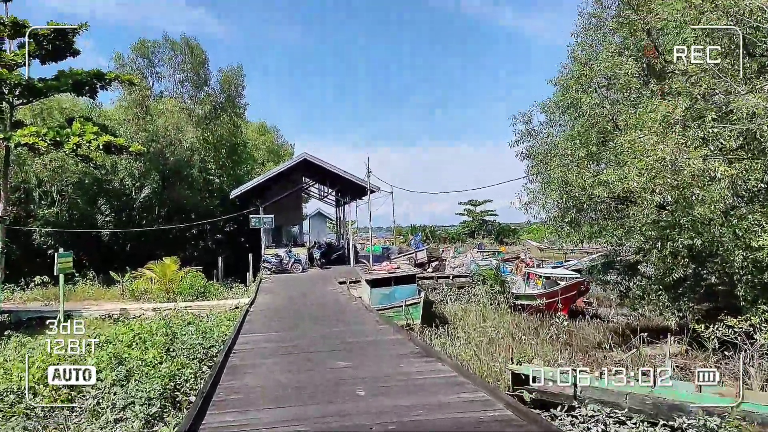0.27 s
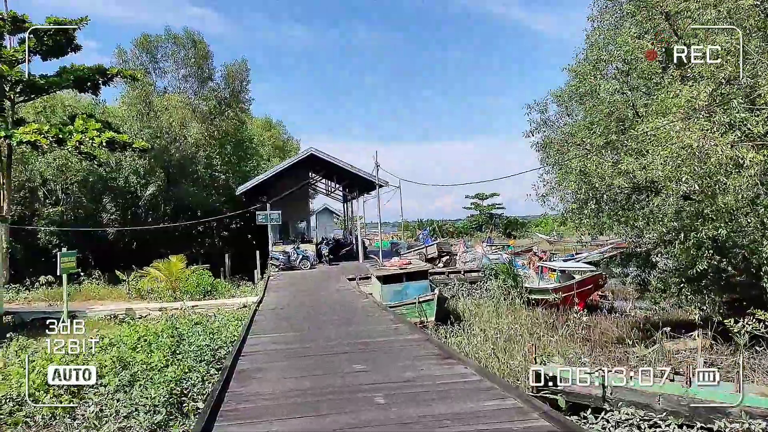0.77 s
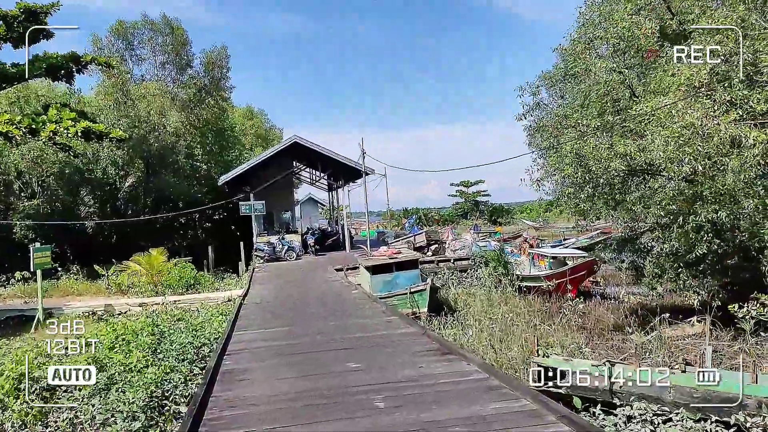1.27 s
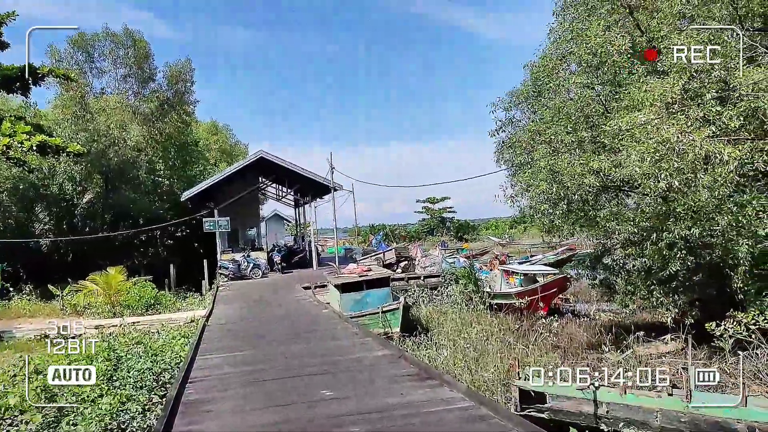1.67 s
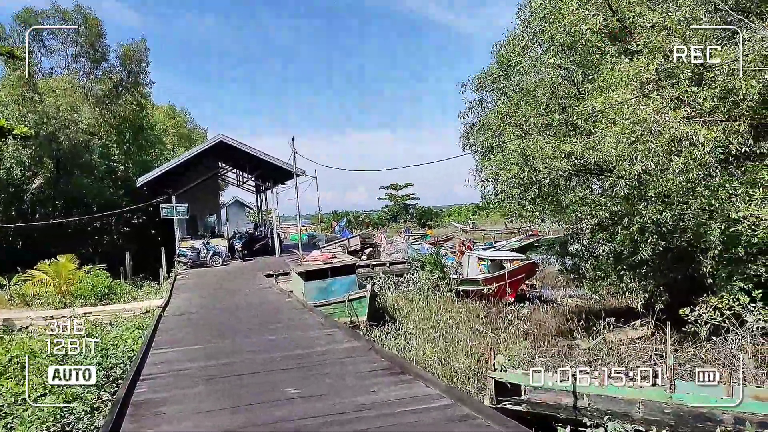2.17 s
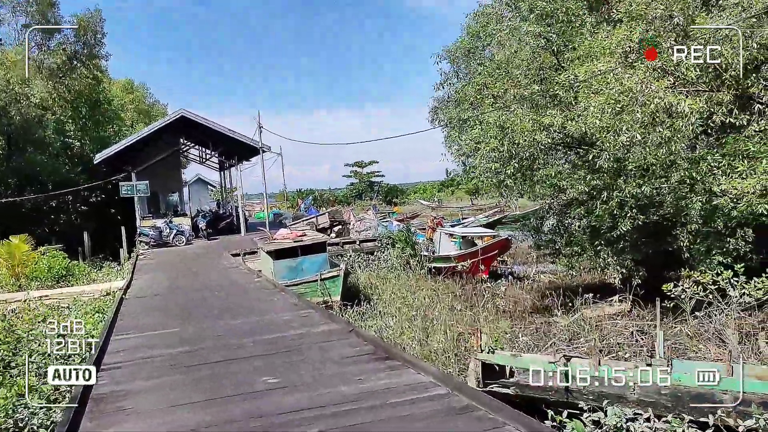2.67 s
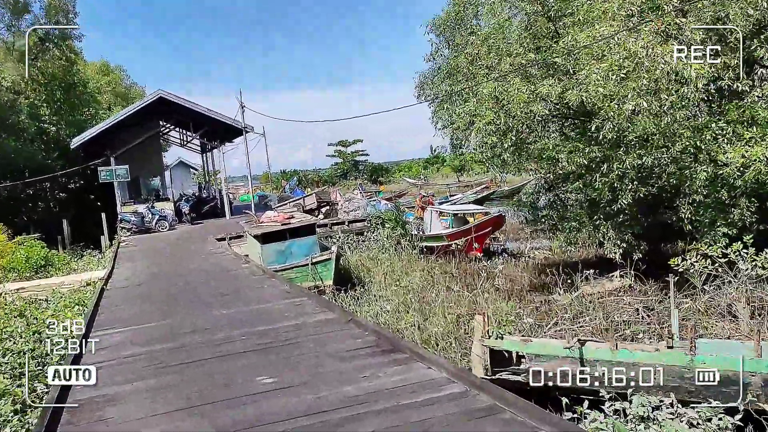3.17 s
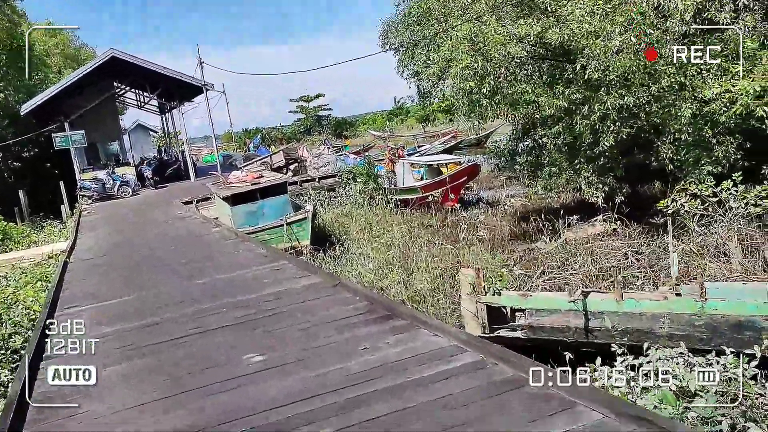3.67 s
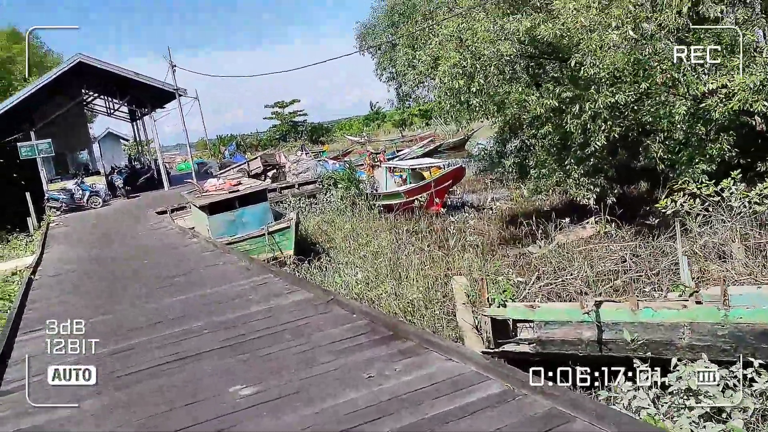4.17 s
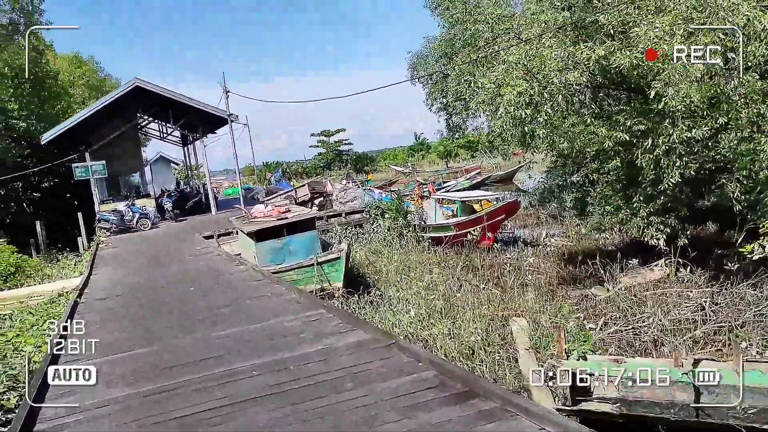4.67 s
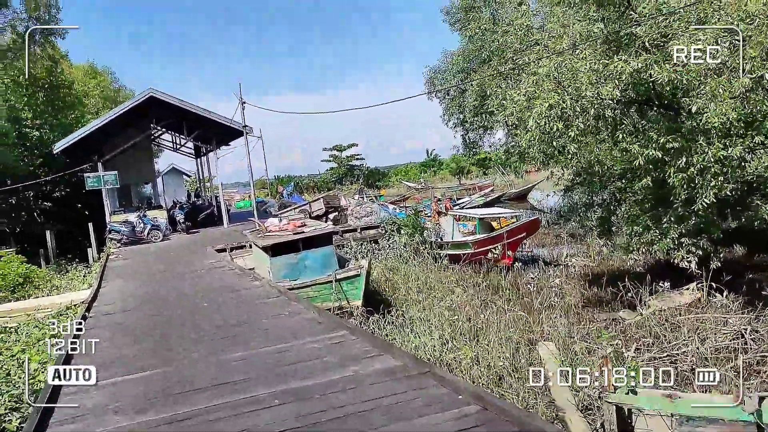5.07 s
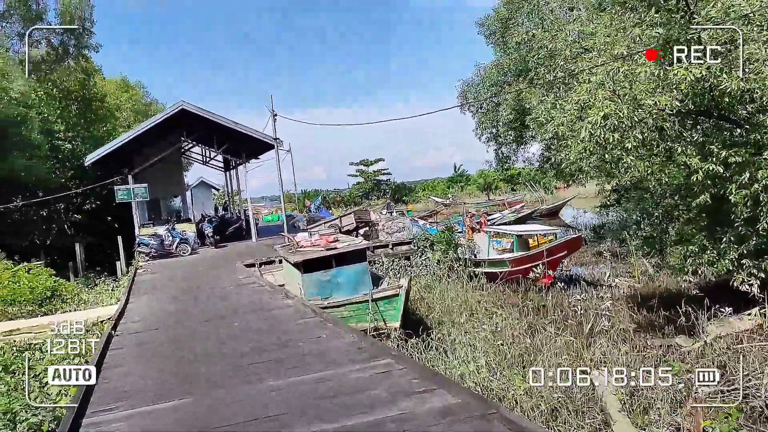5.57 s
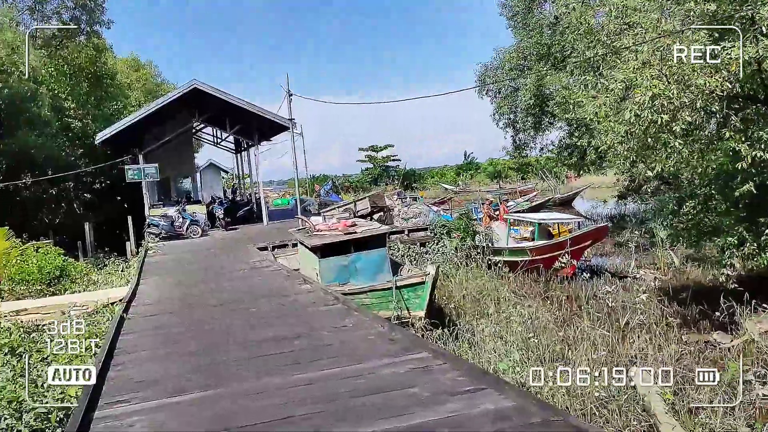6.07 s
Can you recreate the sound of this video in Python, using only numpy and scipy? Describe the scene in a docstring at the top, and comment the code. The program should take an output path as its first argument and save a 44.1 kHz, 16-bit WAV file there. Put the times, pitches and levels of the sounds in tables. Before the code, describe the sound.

Outdoors on a wooden walkway, a sharp cicada drone shimmers throughout, brighter toward the left. Someone moves with faint cloth and sole scuffs, gritty ticks and a slight board creak, then takes firmer steps that knock woodenly in the second half. A breeze rumbles unevenly against the two microphones, with a big pop on the right early and smaller ones mostly left. Faint distant murk lies beneath.

```python
"""Cicadas drone in the trees: two near ones throb, each at its own pace, over a far chorus.
Their song is noise shaped by body resonances, gated by fast clicks in the two near singers.
Someone walks on a plank walkway: knocks and ticks are dying tones, scuffs and a creak are shaped noise.
A breeze buffets the two microphone ports separately with low, lumpy noise and single pops.
A faint outdoor murk lies under it all."""
import sys
import numpy as np
from scipy import signal
from scipy.fft import rfft, irfft, next_fast_len
from scipy.io import wavfile
from scipy.ndimage import uniform_filter1d, map_coordinates

SR = 44100
rng = np.random.default_rng(int(sys.argv[2]) if len(sys.argv) > 2 else 0)


def store_wav(level_fs):
    """Save 16-bit WAV to argv[1]."""
    pcm = np.round(np.clip(np.atleast_2d(level_fs), -1, 1) * 32767)
    wavfile.write(sys.argv[1], SR, pcm.T.astype(np.int16))


N = 279153  # length in samples, about 6.33 s


def amp(db):
    """Turns dB into a gain."""
    return 10 ** (np.asarray(db) / 20)


def unit(x):
    """Scales a sound to rms 1, all its channels together."""
    return x / np.sqrt(np.mean(x ** 2) + 1e-20)


def along(points, hz):
    """Reads each column after the frequency at hz, along a log frequency axis."""
    f, *cols = np.transpose(points)
    return np.array([np.interp(np.log(hz + 1), np.log(f + 1), c) for c in cols])


def curves(rows):
    """Draws each column after the time as a curve with one value per sample."""
    s, *cols = np.transpose(rows)
    return [np.interp(np.arange(N) / SR, s, c) for c in cols]


def wobble(rate):
    """A smooth random curve through rate random points a second."""
    points = rng.standard_normal(int(N * rate / SR) + 4)
    return map_coordinates(points, [np.arange(N) * rate / SR])


def swell(s, db, fall_s, rise=1):
    """Gain that climbs to a crest at s and falls 10 dB in fall_s; rise is rise time over fall time."""
    late = np.arange(N) / SR - s
    away = np.maximum(late, -late / abs(rise))
    return amp(db - 10 * away / abs(fall_s))


def filtered(x, response):
    """Filters x by a response, real or complex, given as a function of frequency."""
    m = next_fast_len(N + SR // 2)
    hz = np.fft.rfftfreq(m, 1 / SR)
    return irfft(rfft(x, m) * response(hz), m)[..., :N]


def patchy(depth_db):
    """Two unrelated noises that share random loud and soft patches in time and pitch."""
    z = signal.stft(rng.standard_normal((2, N)), nperseg=512)[2]
    field = rng.standard_normal(z.shape[1:])
    field = uniform_filter1d(field, size=5, axis=0)
    field = uniform_filter1d(field, size=6, axis=1)
    return signal.istft(z * amp(depth_db * unit(field)), nperseg=512)[1][:, :N]


def pair(a, b, alike):
    """Mixes two sources into left and right; alike sets how far the sides agree, 0 to 1."""
    turn = np.arccos(np.clip(alike, 0, 1)) / 2
    shared, opposed = np.cos(turn) * a, np.sin(turn) * b
    return np.array([shared + opposed, shared - opposed])


def sides(pan_db):
    """Left and right gains pan_db apart, positive to the left, with a mean of 1."""
    r = amp(pan_db)
    return np.array([2 * r / (1 + r), 2 / (1 + r)])


def add(track, s, sound):
    """Mixes a stereo sound into the track at s seconds."""
    part = track[:, max(round(s * SR), 0):][:, :sound.shape[1]]
    part += sound[:, :part.shape[1]]


def lean(hz):
    """Left and right gains by frequency: the left is stronger, most of all in the treble."""
    # Each row: frequency in Hz, left dB, right dB.
    return amp(along([(300.2, -1.025, -4), (999, -0.531, -1.5), (2993, 0.963, -6.5)], hz))


def outdoor_murk():
    """Distant outdoor sound as a steady floor of patchy noise, mostly low in pitch."""
    # Tone of the murk. Each row: frequency in Hz, relative level in dB per Hz.
    murk_tone = [(120, -29.5), (200, -2), (802, -9), (2280, -24.5), (3170, -28.5), (3750, -46.5),
                 (4200, -22), (5460, -50.5), (9240, -120)]
    noise = pair(*patchy(depth_db=4.0), alike=0.4198)
    murk = filtered(noise, lambda hz: amp(along(murk_tone, hz)) * lean(hz))
    return amp(-53.5) * unit(murk)


def wind():
    """Lumpy turbulence, unrelated from port to port, with a few single pressure pops."""
    # Tone of the turbulence. Each row: frequency in Hz, relative level in dB per Hz.
    rumble_tone = [(13, -49.5), (22, -8), (113, 2.5), (170, -1), (225, -8.5), (258, -8), (413, -17),
                   (600, -28), (780, -52), (1320, -120)]
    # Steady breeze on the ports. Each row: time in seconds, left level in dB, right level in dB.
    breeze = [(0, -42, -46.5), (2.9, -43.5, -49), (3.6, -47.5, -48), (4.6, -48, -47), (5.3, -50, -50),
              (6.33, -58.5, -51)]
    # Gusts. Each row: crest time in seconds, left dB, right dB, seconds to fall 10 dB (sign ignored).
    gust_rows = [(.06, -33, -43, 0.3794), (.56, -29.5, -36, 0.1083), (.9, -24.5, -22, 0.2069),
                 (1.33, -28.5, -55, 0.2429), (1.68, -35, -36, 0.2857), (2.2, -29.5, -44, 0.2757),
                 (2.62, -25, -41, 0.1697), (2.8, -42, -38, 0.2038), (3.08, -24, -43.5, 0.1164),
                 (3.5, -42, -41, 0.3609), (3.92, -36.5, -41.5, 0.134), (4.26, -37.5, -39.5, 0.1476),
                 (4.62, -41.5, -44.5, 0.16), (4.88, -52.5, -37.5, -0.0011), (5.46, -49, -41, -0.2186),
                 (6.0, -27.5, -43, 0.1381), (6.33, -43, -47.5, 0.134)]
    # Pops, leaning to one port. Each row: time in seconds (the crest comes about 6 ms later),
    # peak in dB averaged as gain over both ports, left minus right in dB, pitch in Hz.
    pops = [(0.028, -24, 16.5, 142.3), (0.23, -22.5, 13, 113.4), (0.667, -4.5, -40, 172.5),
            (0.713, -17.5, -7.5, 113.3), (0.927, -30, -1, 145.1), (0.975, -15, -15.5, 165.7),
            (1.208, -22, 28.5, 103.4), (1.231, -24, 24.5, 91.65), (1.391, -21.5, 31.5, 131.7),
            (1.519, -22, 30, 184.3), (2.243, -20, 25, 131.4), (2.546, -20.5, 12, 144.8),
            (2.62, -19, 18, 217.7), (3.051, -16, 30, 107), (5.896, -20, 22.5, 142.2),
            (5.981, -13, 23.5, 151.2)]

    noise = filtered(rng.standard_normal((2, N)), lambda hz: amp(along(rumble_tone, hz)))
    lumps = amp(4 * np.array([wobble(32), wobble(32)]))  # 4 dB deep
    gust_power = 0
    for s, left_db, right_db, fall_s in gust_rows:
        crest_db = np.array([[left_db], [right_db]])
        gust_power = gust_power + swell(s, crest_db, fall_s) ** 2
    out = np.sqrt(amp(curves(breeze)) ** 2 + gust_power) * unit(lumps * noise)

    t = np.arange(-800, 800) / SR
    for s, db, side_db, hz in pops:
        u = (np.pi * hz * t) ** 2
        pulse = (1 - 2 * u) * np.exp(-u)  # one crest between two dips
        add(out, s - .012, amp(db) * sides(side_db)[:, None] * pulse)
    return out


def creak():
    """Boards rub under load: uneven slips excite a few board resonances."""
    # Creaks. Each row: start in seconds, length in seconds, level in dB.
    creak_rows = [(.05, 0.28993, -44), (1.417, 0.65994, -44.5)]
    # Board resonances. Each row: pitch in Hz, width in Hz, relative level in dB.
    resonances = [(322.56, 87.13, 7), (1172.8, 40.67, 0), (583.7, 191.4, -18)]
    edge_s, fade_db = 0.05366, 3  # soft edges just outside each creak; loss from start to end

    t = np.arange(N) / SR
    level = 0
    for s, length, db in creak_rows:
        inside = np.minimum(t - s, s + length - t)
        edges = np.clip(inside / edge_s + 1, 0, 1) ** 2
        level = level + amp(db - fade_db * (t - s) / length) * edges

    def board(f):
        total = 0
        for k, (center, width, db) in enumerate(resonances):
            loss = 1j * f * width
            total = total + (-1) ** k * amp(db) * loss / (center * center - f * f + loss)
        return total

    slips = rng.standard_normal((2, N)) * amp(5.637 * wobble(45.134))
    return level * unit(filtered(pair(*slips, alike=0.996), board))


def scuffs():
    """Soles and cloth rub: grainy noise swells at each scuff over a faint steady rustle."""
    # Tone of the rustle. Each row: frequency in Hz, relative level in dB per Hz.
    rustle_tone = [(500, -15), (1000, -6.5), (1400, -4.5), (2200, -3), (3300, -6), (4300, -13.5),
                   (6000, -59.5)]
    # Scuffs. Each row: crest time in seconds, crest level in dB, seconds to fall by 10 dB.
    scuff_rows = [(.15, -48, 0.1631), (.34, -50, 0.173), (.56, -49.5, 0.2547), (.98, -46.5, 0.1792),
                  (1.21, -50, 0.1657), (1.5, -48, 0.3813), (1.879, -43.5, 0.0865), (2.06, -54, 0.3151),
                  (2.47, -50.5, 0.4421), (3.14, -40, 0.0735), (3.35, -46, 0.078), (3.47, -47.5, 0.0807),
                  (3.79, -42.5, 0.1368), (4.25, -52, 0.0544), (4.84, -41.5, 0.0541), (4.93, -34.5, 0.0549),
                  (5.13, -44, 0.0882), (5.6, -55.5, 0.3456), (5.98, -47, 0.1803), (6.12, -55, 0.2694)]

    noise = pair(*patchy(depth_db=3.0), alike=0.0988)
    rustle = filtered(noise, lambda hz: amp(along(rustle_tone, hz)) * lean(hz))
    scuff_power = sum(swell(*row, rise=0.7826) ** 2 for row in scuff_rows)
    level = np.sqrt(amp(-58) ** 2 + scuff_power)  # the steady rustle lies at -58 dB
    grain = amp(0.9577 * wobble(90))
    return level * grain * unit(rustle)


def ticks():
    """Grit and gear tick: each is a short ring about one pitch, blurred by phase noise."""
    # Ticks. Each row: start in seconds, level in dB before panning, pitch in Hz,
    # seconds to die by 60 dB, blur as random phase step in radians per sample.
    tick_rows = [(0.3067, -30.5, 1920, 0.02801, 0.07), (0.3557, -25.5, 2320, 0.01056, 0.48),
                 (0.366, -21.5, 2515, 0.01555, 0.44), (.4248, -35, 1677, 0.02798, 0.26),
                 (0.556, -33.5, 1780, 0.0498, 0.27), (1.276, -48.5, 1592, .02, 0.28),
                 (1.548, -39.5, 1347, 0.0546, 0.14), (1.584, -37, 2597, 0.0271, 0.14),
                 (1.86, -31, 3013, 0.02278, .4), (2.043, -24.5, 2427, 0.01961, 0.34),
                 (2.061, -47, 1077, 0.2854, 0), (3.459, -33, 1301, 0.0241, 0.46),
                 (3.481, -30.5, 2296, 0.02832, 0.36), (3.77, -31.5, 1702, 0.0646, 0.01),
                 (4.559, -38.5, 2251, 0.02006, 0.34), (6.073, -27.5, 1980, 0.04542, 0.22),
                 (6.141, -35, 1104, 0.0233, 0.16)]
    out, t = np.zeros((2, N)), np.arange(6000) / SR
    for s, db, hz, t60, blur in tick_rows:
        phase = np.cumsum(2 * np.pi * hz / SR + blur * rng.standard_normal(len(t)))
        onset = 1 - np.exp(-t / 0.0011103)
        ring = amp(db - 60 * t / abs(t60)) * onset * np.sin(phase)
        add(out, s, ring * sides(11.245)[:, None])  # toward the left
    return out


def steps(count=64):
    """Every knock lands on another board, so its many damped modes fall at new pitches."""
    # Knocks. Each row: start in seconds, relative level in dB, hardness in dB per octave,
    # ring time as a share of the plank's.
    knocks = [(0.193, -28.5, 1, 0.3883), (1.99, -22.5, 0.5, 0.7412), (2.358, -34, 1, 0.8446),
              (3.122, -3, 2.5, 0.4782), (3.137, -9.5, -1, 0.5037), (3.164, -20.5, -1.5, 1.694),
              (3.216, -19.5, -2.5, 1.1187), (3.333, -19.5, -4.5, 0.6324), (3.458, -30, -1, 0.4638),
              (3.683, -13.5, -4.5, 0.6675), (3.749, -9.5, -3.5, 0.4572), (3.774, -21.5, -3.5, 1.711),
              (3.832, -17, -2.5, 0.3311), (4.8386, -9.5, 3, 0.14394), (4.845, -8.5, -0.5, 0.5367),
              (4.875, -20.5, -3.5, 1.1605), (5.461, -13.5, 0.5, 0.46), (5.468, -14.5, -1, 0.8206),
              (5.958, -25, 0.5, 1.373), (6.073, -25.5, 1, 1.347)]
    # Plank modes. Each row: frequency in Hz, relative level in dB, seconds to die by 60 dB.
    plank = [(91.98, -27.5, 0.1718), (173.97, -6, 0.2267), (310.22, 3, 0.19482), (472, -5.5, 0.19317),
             (633.9, -5, 0.1765), (948, -11, 0.12662), (1395, -17, 0.19876), (2510, -14.5, 0.10005),
             (3600, -21.5, 0.1383)]

    out, t = np.zeros((2, N)), np.arange(SR // 3) / SR
    for s, db, hardness_db, ring in knocks:
        place, strength, apart = rng.random((3, count, 1))
        hz = 90 * 40 ** ((np.arange(count)[:, None] + place) / count)  # spread from 90 to 3600 Hz
        level_db, t60 = along(plank, hz)
        level_db = level_db + hardness_db * np.log2(hz / 300) + 6 * strength
        # Soft soles pass fewer highs.
        cutoff_hz = 900 * 2 ** (hardness_db / 5)
        level_db = level_db - 10 * np.log10(1 + (hz / cutoff_hz) ** 4)
        # The body shades the right side; left and right change in dB per octave.
        lean_db = np.clip(np.log2(hz / 600), 0, 2) * np.array([1.2, -1.6])[:, None, None]
        # Bending waves: the highs arrive first.
        rise = (1 - np.exp(-t * hz / 0.9192)) ** 2
        # The two microphones differ more at high pitch.
        lag = 2 * np.pi * np.clip(hz / 5000, 0, 1) * (apart - .5) * np.array([1, -1])[:, None, None]
        phase = 2 * np.pi * (hz * t + strength * .4) + lag  # starts spread over 0.4 cycle
        decay_db = 60 * t / abs(ring * t60)
        modes = amp(level_db + lean_db - decay_db) * rise * np.sin(phase)
        knock = np.sum(modes, 1)
        # A hard heel edge clacks before the board answers.
        snap = np.sin(2 * np.pi * 750 * t) * amp(2 * hardness_db - 60 * t / .012)
        add(out, s, amp(db - 10.0) * (knock / np.std(knock[:, :900]) + snap))
    return out


def singer(rows, throb_hz, click_hz, wander_hz, click_depth):
    """The tymbals click fast and roughly; the abdomen pumps, so the song throbs."""
    level_db, lead = curves(rows)
    cycles = throb_hz * np.arange(N) / SR + lead + 0.04928 * wobble(6.6)
    turn = 2 * np.pi * cycles
    # Slow rise, broad crest, quicker fall, narrow dip.
    throb = np.cos(turn) - 0.2159 * np.cos(2 * turn + 0.6664)
    clicks = np.cumsum(click_hz + wander_hz * wobble(1.5)) / SR
    rough_clicks = clicks + 0.1158 * wobble(40)
    gate = np.exp(click_depth * np.cos(2 * np.pi * rough_clicks))
    level = amp(level_db + 1.0735 * wobble(25))
    return level * unit(amp(5 * throb) * gate)  # 5 dB of swing per unit of throb


def cicadas():
    """All sing through alike body resonances; the near ones are brighter than the far chorus."""
    # Song at each microphone. Each row: frequency in Hz, relative left dB per Hz,
    # relative right dB per Hz, left-right likeness from 0 to 1.
    song = [(3817.3, -67, -45.5, 0), (4557.1, -17.5, -23.5, 0.06), (5213.7, -9.5, -17, 0),
            (5809.9, 2.5, -10, 0.03), (6500.7, -3, -13.5, 0.2), (7212.4, -9.5, -11, 0.89),
            (8435.9, -24, -22.5, 0.34), (9073, -36, -36.5, 0), (9875.1, -23.5, -23.5, 0.29),
            (10957, -14.5, -18, 0.5), (12231, -13, -22, 0.37), (13415, -27, -62.5, 0),
            (14288, -26, -57.5, 0.01), (14715, -18, -37, 0.08), (15459, -11.5, -22, 0.09)]
    # Shares of the song. Each row: frequency in Hz, far chorus dB, slow singer dB, fast singer dB.
    shares = [(5992.4, -1.5, -3.5, -9.5), (6975, 0.5, -0.5, -11), (11052, -3, 0, -4),
              (15100, -10, 2.5, -17)]
    # Far chorus. Each row: time in seconds, relative level in dB.
    chorus = [(0, -24), (1.2, -25), (2.2, -25), (3.7, -24.5), (5, -25), (6.33, -25)]
    # Slow singer. Each row: time in seconds, relative level in dB, throb lead in cycles.
    slow = [(0, -27.5, 0.2209), (.7, -25.5, 0.1347), (2, -26.5, 0.143), (2.8, -27, 0.3862),
            (4.1, -27.5, 0.1712), (4.9, -30, 0.2674), (6.33, -28.5, 0.1625)]
    # Fast singer, off to the left. Each row: time in seconds, relative level in dB, throb lead in cycles.
    fast = [(0, -24.5, 1.2933), (.7, -23, 0.8644), (1.9, -18.5, 0.5877), (3.7, -23.5, 0.4398),
            (4.8, -20.5, 0.6916), (5.5, -21, 0.6375), (6.33, -26, 0.967)]

    efforts = [amp(curves(chorus)[0] + 0.301 * wobble(7.1)),
               singer(slow, throb_hz=6.42, click_hz=211.91, wander_hz=24.984, click_depth=0.1996),
               singer(fast, throb_hz=8.19, click_hz=245.79, wander_hz=4.9697, click_depth=0.379)]
    # Left and right dB; the fast singer is shaded from the right microphone.
    aside = [[[0], [0]], [[0], [0]], [[0], [-5]]]

    m = next_fast_len(N)
    hz = np.fft.rfftfreq(m, 1 / SR)
    left_db, right_db, alike = along(song, hz)
    ears = amp([left_db, right_db]) * (hz > 3600)  # no song below 3600 Hz
    total = 0
    for effort, share_db, side_db in zip(efforts, along(shares, hz), aside):
        voices = rfft(effort * patchy(depth_db=1.7811), m)
        total = total + pair(*voices, alike) * amp(share_db + side_db)
    return amp(16) * irfft(total * ears, m)[:, :N]


def scene():
    """Everything at the two microphones."""
    return outdoor_murk() + wind() + creak() + scuffs() + ticks() + steps() + cicadas()


def record(dry):
    """The input stage flattens the largest peaks; nothing is kept from 15870 Hz up."""
    clipped = dry / (1 + abs(dry / .98) ** 8) ** (1 / 8)
    return filtered(clipped, lambda hz: hz < 15870)


dry = scene()
out = record(dry)
store_wav(out)
```